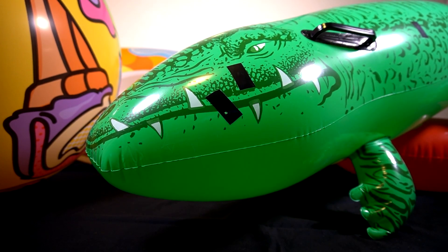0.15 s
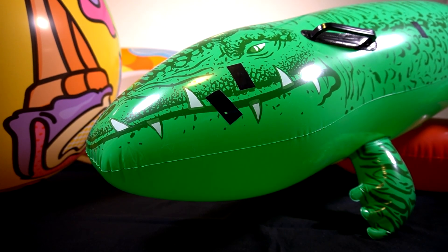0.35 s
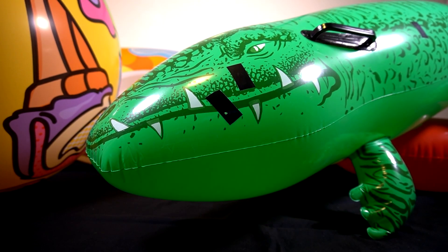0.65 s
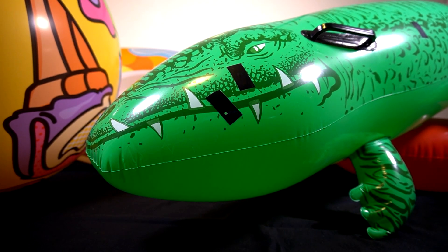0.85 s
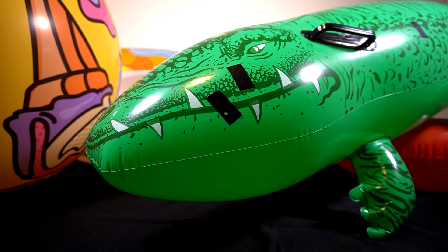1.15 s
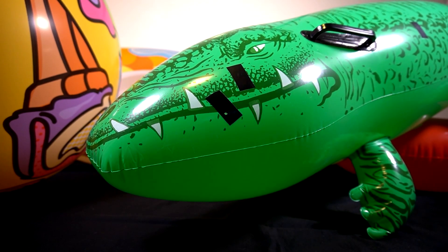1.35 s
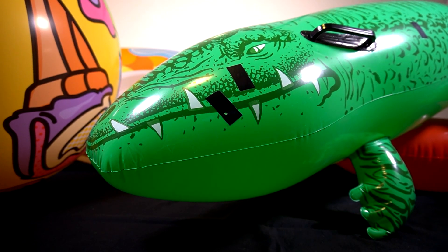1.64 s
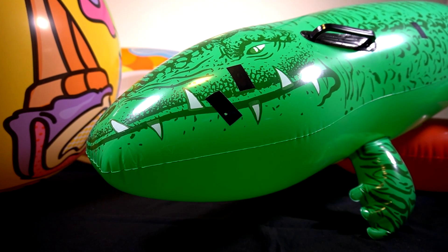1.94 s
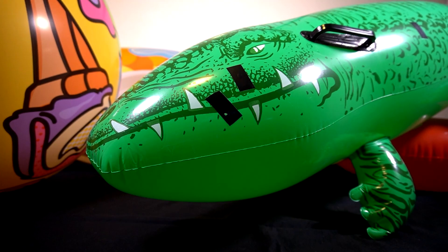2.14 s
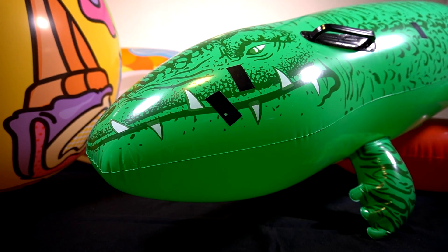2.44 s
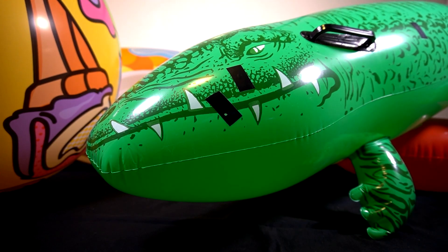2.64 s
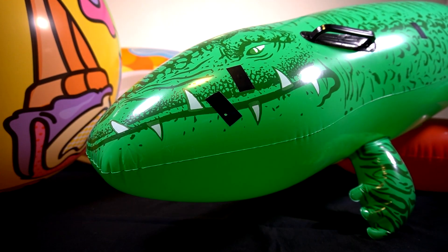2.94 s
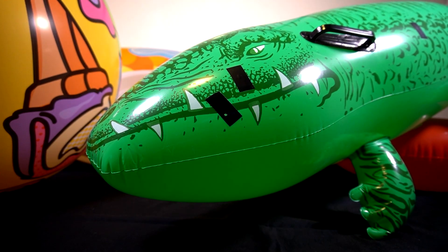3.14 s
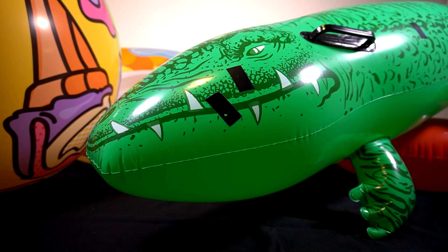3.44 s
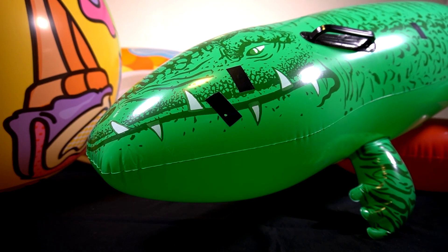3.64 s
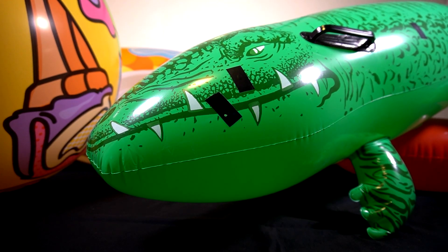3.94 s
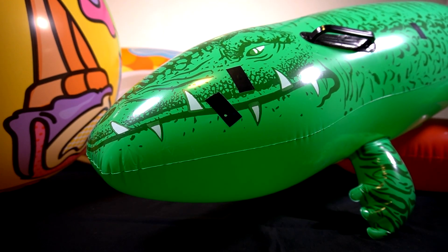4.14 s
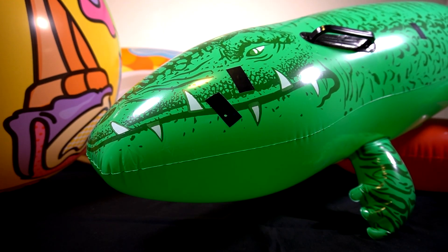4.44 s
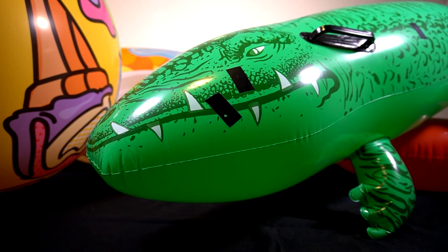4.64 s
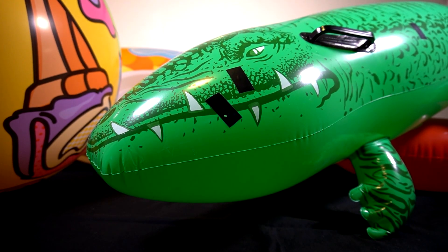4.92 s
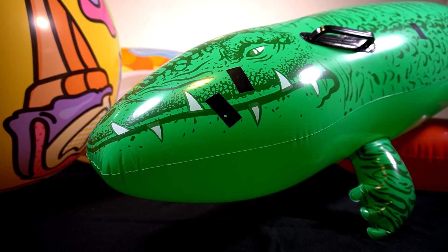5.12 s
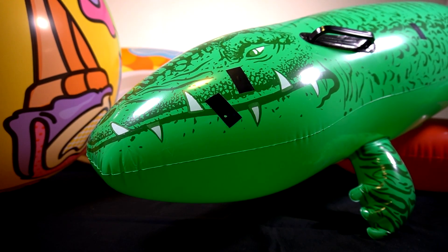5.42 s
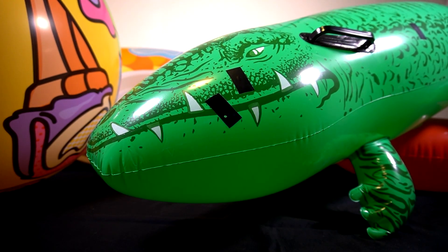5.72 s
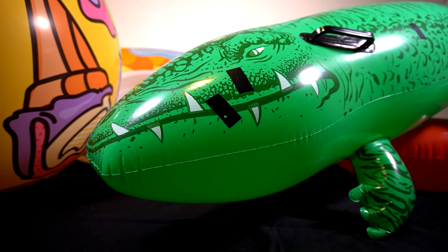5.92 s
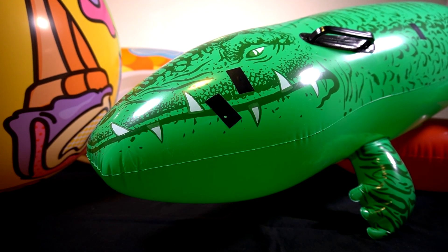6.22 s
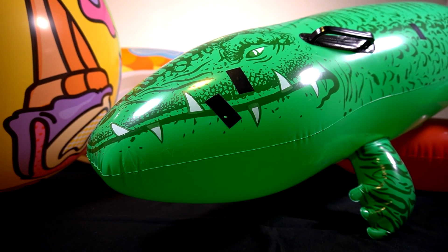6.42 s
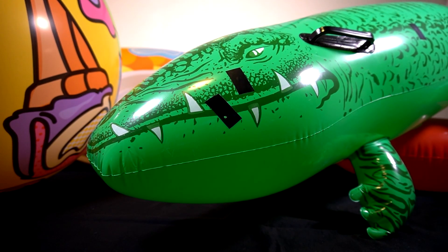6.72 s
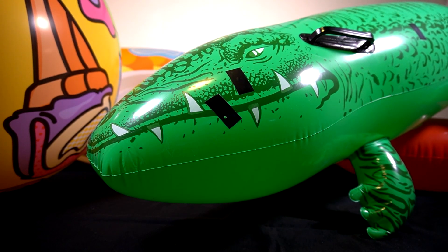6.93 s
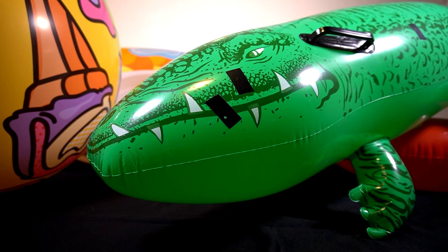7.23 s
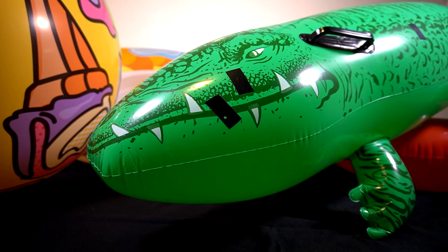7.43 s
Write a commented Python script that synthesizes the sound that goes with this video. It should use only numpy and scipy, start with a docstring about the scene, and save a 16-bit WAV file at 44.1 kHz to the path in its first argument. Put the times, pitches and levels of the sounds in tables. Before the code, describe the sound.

Air hisses loudly and steadily from a small hole in an inflatable vinyl toy, with low fluttering buffets and one brief squeaky whistle near the end.

```python
"""Air hisses out of a small hole in an inflatable vinyl toy: turbulent jet noise, as shaped random spectra.
The hole's edge whistles as gliding noise bands that narrow toward tones, clearly only once.
The air inside rings faintly as resonant noise and thin tones, over a weak diffuse rush.
The jet flutters against the microphone as low, lumpy noise with brief swings of pressure in its gusts;
the loudest peaks make a limiter duck the whole sound."""
import sys
import numpy as np
from scipy import signal
from scipy.fft import rfft, irfft
from scipy.io import wavfile
from scipy.ndimage import uniform_filter1d, minimum_filter1d

SR = 44100
rng = np.random.default_rng(int(sys.argv[2]) if len(sys.argv) > 2 else 0)


def file_out(sig):
    """Save sig as 16-bit WAV at sys.argv[1]."""
    # one column per channel
    cols = np.atleast_2d(sig).T
    # limit, then scale
    lim = np.clip(cols, -1, 1)
    pcm = np.round(lim * 32767).astype(np.int16)
    wavfile.write(sys.argv[1], SR, pcm)


N = 333837
TIME, BINS = np.arange(N) / SR, np.fft.rfftfreq(N, 1 / SR)


def gain_of(db):
    """Logarithmic level: decibels become an amplitude factor."""
    return 10 ** (np.asarray(db) / 20)


def evened(x):
    """Normalisation of mean power: scales to rms 1."""
    return x / np.sqrt(np.mean(x ** 2) + 1e-20)


def at_frequency(points, hz):
    """Spectral interpolation: reads a table along a log-frequency axis."""
    f, value = np.transpose(points)
    return np.interp(np.log(hz + 1), np.log(f + 1), value)


def noise(shape):
    """Spectral shaping: white noise filtered to the given gain per frequency, at rms 1."""
    return evened(irfft(rfft(rng.standard_normal(N)) * shape, N))


def drift(rate_hz):
    """Low-pass random fluctuation, up to about the given rate."""
    return noise(1 / (1 + (BINS / rate_hz) ** 4))


def pair(make, same):
    """Partial coherence: two draws of a sound mixed to a given left-right likeness (0-1)."""
    left = make()
    return np.array([left, same * left + np.sqrt(1 - same ** 2) * make()])


def bump(s, spread_s):
    """Gaussian envelope: a smooth rise and fall of height 1 around a moment."""
    return np.exp(-np.minimum(((TIME - s) / spread_s) ** 2, 100) / 2)


def room_air(level_db=-66, top_hz=1100):
    """Diffuse field: a faint low-pass rush, nearly independent at the two ports."""
    return gain_of(level_db) * pair(lambda: drift(top_hz), same=0.12)


# broad resonances of the enclosed air, before the swells: pitch_hz, half_width_hz, level_db
RESONANCES = [(2128, 29, -64), (2370, 280, -66)]
# thin tones sung by the opening, before swell and shimmer: pitch_hz, level_db, swell_share (0-1)
THIN_TONES = [(1873, -78, .5), (2248, -70.5, .7), (2395, -64.5, 1), (2580, -76, .7), (2767, -73, .2),
              (5034, -69.5, .2), (5220, -66.5, .2), (5551, -66.5, .2), (5738, -66.5, .2)]
# slow swells of the ringing: centre_s, spread_s, rise_db
RING_SWELLS = [(.4, 0.38, 10), (2.513, 0.58, 4), (4.105, 0.55, 11), (6.616, 0.75, 12)]
RING_REST_DB = -8


def rings(shimmer_db=2.0):
    """Cavity resonance: the jet keeps the enclosed air ringing and sings thin, wavering tones."""
    swell_db = RING_REST_DB + sum(db * bump(s, spread) for s, spread, db in RING_SWELLS)
    out = np.zeros((2, N))
    for hz, width, db in RESONANCES:
        response = 1 / (1 + ((BINS - hz) / width) ** 2)
        out += gain_of(db + swell_db) * pair(lambda: noise(response), same=0.42)
    for hz, db, share in THIN_TONES:
        wavering_hz = hz + 2.8 * drift(15)
        tone = evened(np.sin(2 * np.pi * np.cumsum(wavering_hz) / SR))
        out += gain_of(db + share * swell_db + shimmer_db * (drift(3.1) + 0.8)) * tone
    return out


# notes caught by the edge of the hole, level before envelope and unsteadiness:
# start_s, length_s, pitch_hz, glide_hz_per_s, level_db, purity (0-1)
EDGE_NOTES = [(1.12, 0.16, 4540, -200, -55, .2), (1.15, 1.05, 3350, 330, -64, 0.06),
              (3.1, 0.32, 3300, 82, -62, .05), (4.05, .62, 3480, -250, -57, .1),
              (4.738, .24, 3100, 0, -57, .15), (5.12, 0.45, 3300, 450, -56.5, .1),
              (5.52, 0.37, 3060, 329, -58, 0.4), (6.0, .11, 4490, 600, -55, .6),
              (6.0, 0.7, 3150, 198.5, -58, 0.22), (6.64, 0.367, 3740, -170, -46, 0.82),
              (6.96, 0.21, 3590, -300, -52, 0.5), (7.07, 0.15, 2970, 700, -55.5, 0.5)]
NOTE_RISE_S, NOTE_FALL_S = 0.03, 0.032


def whistles(breadth_hz=130, waver_hz=40, ragged_db=1.2, arch_db=3):
    """Edge tones: gliding bands of breathy noise, nearer to a pure tone as the jet locks on the edge."""
    breathy = pair(lambda: drift(breadth_hz) + 1j * drift(breadth_hz), same=0.49)
    waver = waver_hz * drift(47.4)
    unsteady = gain_of(ragged_db * drift(15))
    out = np.zeros((2, N))
    for start, length, hz, glide, db, purity in EDGE_NOTES:
        held = (TIME > start) & (TIME < start + length)
        t = TIME[held] - start
        pitch_hz = hz + glide * t + (1 - purity) * waver[held]
        carrier = np.exp(2j * np.pi * np.cumsum(pitch_hz) / SR)
        envelope = np.minimum(t / NOTE_RISE_S, 1) * np.minimum((length - t) / NOTE_FALL_S, 1)
        envelope = envelope * gain_of(arch_db * (np.sin(np.pi * t / length) - 1))  # fullest in the middle
        blend = np.sqrt(2 * purity) + np.sqrt(1 - purity) * breathy[:, held]
        out[:, held] += gain_of(db) * envelope * (carrier * blend).real
    return out * unsteady


# relative spectrum of wind on the microphone: frequency_hz, level_db (per Hz)
WIND_SPECTRUM = [(12, -61), (25, -13), (45, -6), (70, -0.5), (105, -1.5), (145, -4), (175, -11.5),
                 (210, -6.5), (270, -13), (350, -20), (450, -27.5), (600, -44), (850, -58), (1500, -58)]
# the jet drifts on and off the microphone, before flurries and lulls: time_s, level_db
JET_AIM = [(0, -20.5), (4.5, -21.5), (5.1, -26), (5.75, -17.5), (6.1, -24.5), (7.57, -20.5)]
# distinct gusts, from strong low buffets to weaker, faster, brighter ones, peak level before spray
# and limiter, and the flurry around each: time_s, level_db, eddy_rate_hz, flurry_spread_s
DISTINCT_GUSTS = [(0.069, -8, 159, 0.012), (.224, -7.5, 141, 0.031), (.325, -10.5, 114, 0.016),
                  (.742, -4.5, 225, 0.025), (.985, -16.5, 274, 0.018), (1.131, -17, 284, 0.014),
                  (1.207, -9.5, 125, 0.014), (1.374, -9.5, 110, 0.0074), (1.552, -10, 252, 0.0076),
                  (1.765, -10, 208, 0.037), (2.228, -8, 97, 0.015), (2.35, -10.5, 100, 0.01),
                  (2.599, -11.5, 262, 0.013), (2.702, -9, 92, 0.0089), (3.055, -8, 131, 0.023),
                  (3.248, -7.5, 200, 0.041), (3.386, -10.5, 204, 0.03), (3.675, -5, 250, 0.029),
                  (3.988, -15.5, 248, 0.021), (4.235, -9, 202, 0.016), (4.342, -8, 207, .02),
                  (4.791, -11.5, 180, 0.05), (4.966, -8.5, 133, 0.0068), (5.021, -16.5, 293, 0.0088),
                  (5.295, -16, 217, 0.0066), (5.512, -8.5, 155, 0.022), (5.586, -10, 230, 0.0033),
                  (5.705, -7, 180, 0.015), (5.848, -8, 161, 0.02), (5.936, -7.5, 137, 0.0054),
                  (6.326, -17, 258, 0.017), (6.386, -9.5, 103, .015), (6.729, -9, 119, 0.0076),
                  (7.05, -9.5, 156, 0.01), (7.454, -19.5, 243, 0.014)]
LULL_AFTER_S, LULL_SPREAD_S, LULL_DB = 0.1, 0.029, -1  # the wind slackens in the wake of each gust


def flutter(bright_db=4.0, split_hz=200, stir=1.07, flurry_db=3.9, puff_hz=29, puff_db=3.5,
            snap_db=2.55, snap_hz=70, ceiling_db=-10.5):
    """Intermittent turbulence: lumps lift small, fast eddies more than large; gusts stir, then slacken it."""
    stirred = sum(bump(s, spread) for s, db, hz, spread in DISTINCT_GUSTS)
    lulls = sum(bump(s + LULL_AFTER_S, LULL_SPREAD_S) for s, db, hz, spread in DISTINCT_GUSTS)
    # eddies pass as separate puffs, some ten to thirty a second
    puffs = noise(BINS / (BINS + 5) / (1 + (BINS / puff_hz) ** 4))
    lumps = 2 * np.tanh((puffs + stir * stirred) / 2)
    spectrum = rfft(noise(gain_of(at_frequency(WIND_SPECTRUM, BINS))))
    low_pass = 1 / (1 + (BINS / split_hz) ** 4)
    large = irfft(spectrum * low_pass, N)
    small = irfft(spectrum * (1 - low_pass), N)
    small = small * gain_of(bright_db * (lumps - 0.5) + snap_db * (drift(snap_hz) - 0.5))
    eddies = evened((large + small) * gain_of(puff_db * lumps))
    aim_db = np.interp(TIME, *np.transpose(JET_AIM))
    eddies *= gain_of(aim_db + flurry_db * stirred + LULL_DB * lulls)
    # ordinary eddies are held to a peak ceiling, below the loudest gusts
    peak = -uniform_filter1d(minimum_filter1d(-abs(eddies), size=300), size=300)
    return eddies / np.maximum(peak / gain_of(ceiling_db), 1)


# phase lag of the wind at the right port: frequency_hz, lag_rad
PORT_LAG = [(10, .07), (50, .35), (100, .72), (200, 1.32), (400, 1.85), (800, 2.0)]


def wind(length_s=0.0029, uneven=0.41, spray_db=-23, spray_hz=420, apart_db=-39, right_db=0.9):
    """Turbulent pressure: gusts replace the flutter with a few uneven swings, left port first."""
    pressure, wobble = flutter(), drift(218)
    spray = gain_of(spray_db) * noise((BINS / spray_hz) ** 2 / (1 + (BINS / spray_hz) ** 5.68))
    sides = rng.choice([-1, 1], len(DISTINCT_GUSTS))  # sign of the pressure swing
    for (s, db, hz, spread), side in zip(DISTINCT_GUSTS, sides):
        near = slice(max(round((s - 0.03) * SR), 0), round((s + 0.03) * SR))
        t = TIME[near] - s
        window = np.exp(-(t / length_s) ** 2 / 2)
        turns = np.cumsum(hz * (1 + uneven * wobble[near])) / SR
        swing = side * np.cos(2 * np.pi * (turns - np.interp(0, t, turns)))
        swing += spray[near] * (2 * hz / spray_hz) ** 2  # fast gusts break up into finer eddies
        pressure[near] += window * (gain_of(db) * swing - pressure[near])
    lag = np.exp(-1j * at_frequency(PORT_LAG, BINS))
    later = gain_of(right_db) * irfft(rfft(pressure) * lag, N)
    # eddies that differ between the ports
    apart = gain_of(apart_db) * noise(gain_of(at_frequency(WIND_SPECTRUM, BINS)))
    return np.array([pressure + apart, later - apart])


# relative spectrum of the jet: frequency_hz, level_db (per Hz)
JET_SPECTRUM = [(650, -37), (1100, -24), (1500, -24), (2000, -18.5), (2700, -18.5), (3500, -14.5),
                (4100, -15), (4600, -12), (6500, -9), (7600, -4), (9700, -2.5), (10700, -3.5),
                (11600, -1.5), (12500, -0.2), (13300, -1), (15600, 1)]
# likeness of the hiss at the two ports: frequency_hz, coherence (0-1)
PORT_LIKENESS = [(1100, .25), (1700, .33), (2200, .64), (3500, .64), (5500, .66), (8000, .75), (11000, .81),
                 (14000, .885)]
# level of the hiss, left minus right: frequency_hz, difference_db
PORT_LEAN = [(1100, 0.23), (2500, 0), (5000, 0.25), (8000, 1.6), (15000, 1.6)]
HISS_DB = -28.4  # rms before the slow wander and the flicker


def hiss(patchy_db=0.77, flicker_db=0.5, wander_db=0.06):
    """Jet noise: steady outflow in restless spectral patches, more coherent between ports toward the top."""
    frames, hz = N // 256 + 5, np.fft.rfftfreq(1024, 1 / SR)
    a, b, c, d, patches = rng.standard_normal((5, frames, 513))
    same, left = at_frequency(PORT_LIKENESS, hz), a + 1j * b
    ports = np.array([left, same * left + np.sqrt(1 - same ** 2) * (c + 1j * d)])
    patches = uniform_filter1d(patches, size=14, axis=0)  # smooth along time
    patches = evened(uniform_filter1d(patches, size=10, axis=1))  # and along frequency
    # a fine random ripple on the spectrum, unchanging in time
    ripple_db = 1.1 * evened(uniform_filter1d(rng.standard_normal(513), size=2))
    half_lean = at_frequency(PORT_LEAN, hz) / 2
    lean_db = np.array([half_lean, -half_lean])[:, None]
    ports *= gain_of(at_frequency(JET_SPECTRUM, hz) + patchy_db * patches + ripple_db + lean_db)
    _, jet = signal.istft(ports.transpose(0, 2, 1), nperseg=1024, noverlap=768)
    return evened(jet[:, :N]) * gain_of(HISS_DB + wander_db * drift(3.5) + flicker_db * drift(19))


def scene():
    """Superposition: the jet, its tones and its wind over the faint rush."""
    return room_air() + rings() + whistles() + wind() + hiss()


def hold(over_db, release_s):
    """Peak detection with exponential release: follows each peak at once, then lets go."""
    fall = TIME / release_s
    return np.exp(np.maximum.accumulate(np.log(over_db + 1e-9) + fall) - fall)


EDGE_HZ = 15750  # upper band limit


def record(dry, limit_db=-11.0, release_s=0.11, slow_share=0.29, slow_release_s=0.76):
    """Peak limiting with quick, then slow release ducks everything on loud peaks; a low-pass follows."""
    smoothed = uniform_filter1d(dry, size=12, axis=1)
    peak_db = 20 * np.log10(abs(smoothed).max(0) + 1e-9)
    over_db = np.maximum(peak_db - limit_db, 0)
    duck_db = np.maximum(hold(over_db, release_s), slow_share * hold(over_db, slow_release_s))
    limited = dry / gain_of(uniform_filter1d(duck_db, size=60))
    low_pass = signal.firwin(511, EDGE_HZ, window=("kaiser", 9), fs=SR)
    return signal.oaconvolve(limited, low_pass[None], "same")


dry = scene()
out = record(dry)
file_out(out)
```